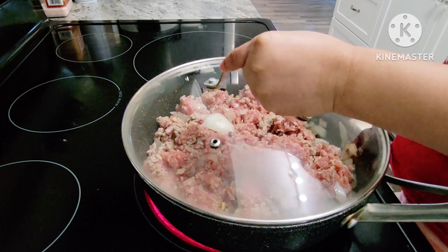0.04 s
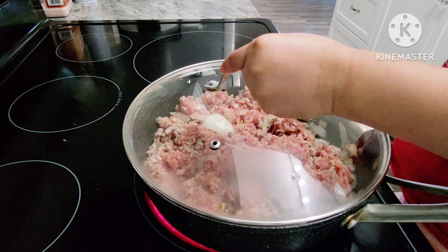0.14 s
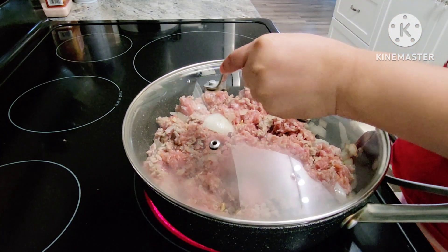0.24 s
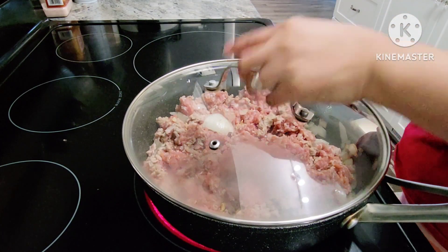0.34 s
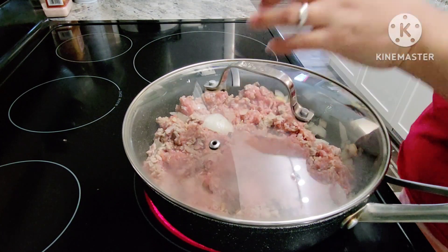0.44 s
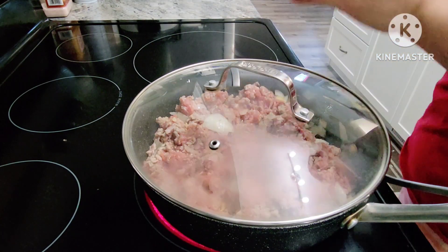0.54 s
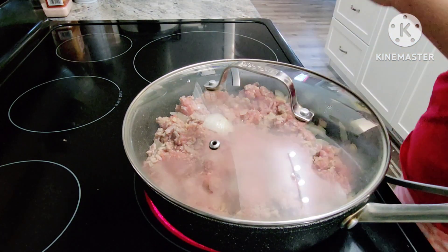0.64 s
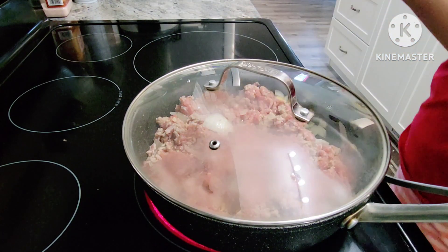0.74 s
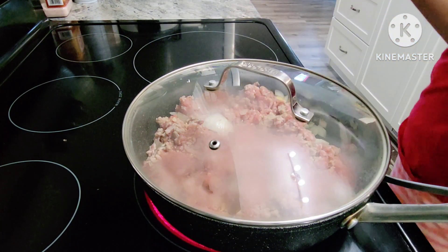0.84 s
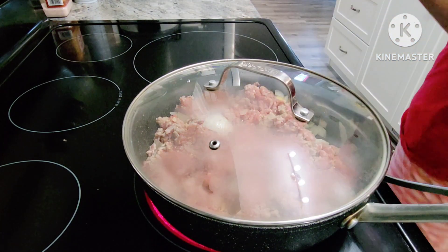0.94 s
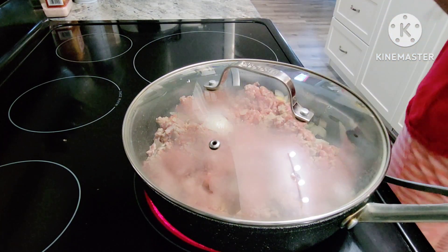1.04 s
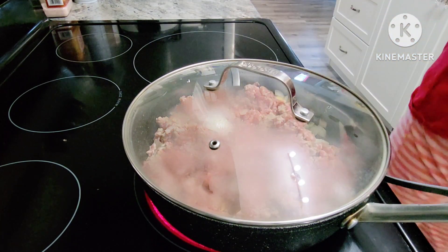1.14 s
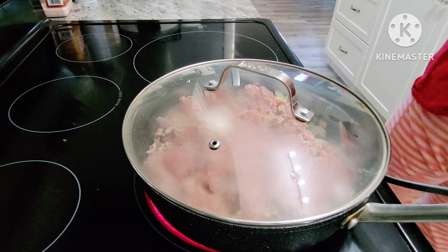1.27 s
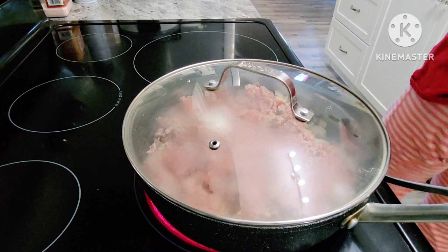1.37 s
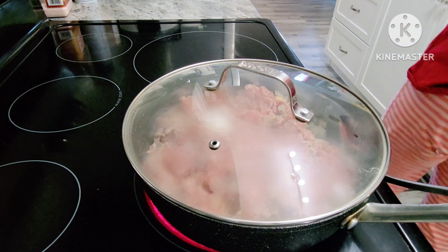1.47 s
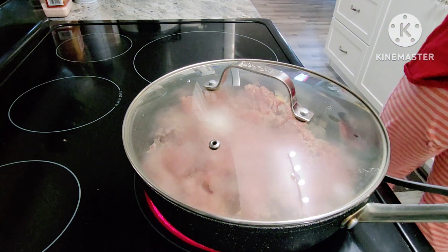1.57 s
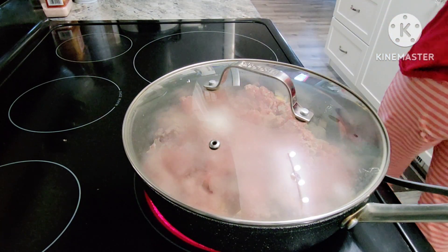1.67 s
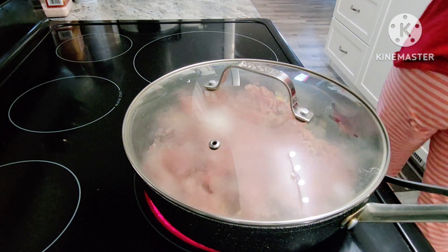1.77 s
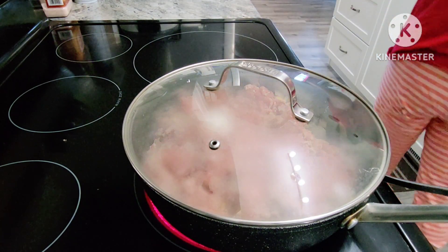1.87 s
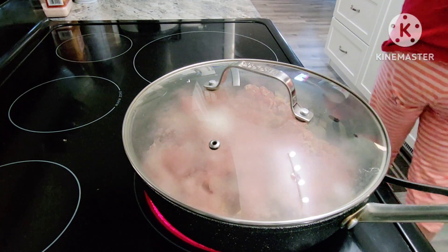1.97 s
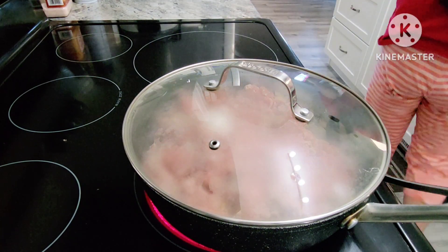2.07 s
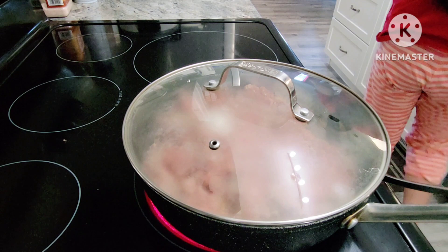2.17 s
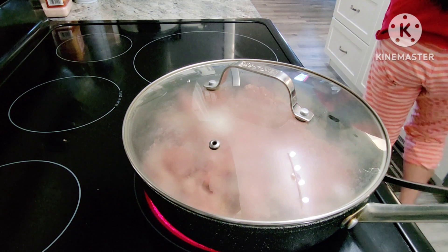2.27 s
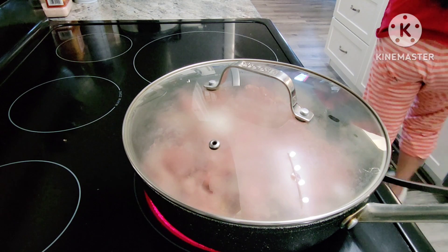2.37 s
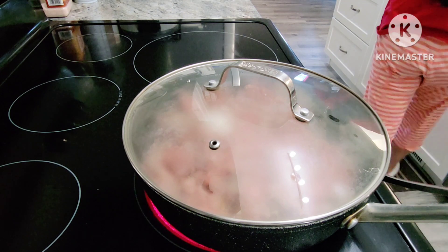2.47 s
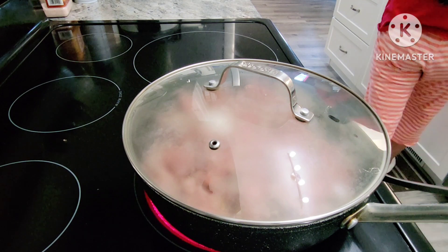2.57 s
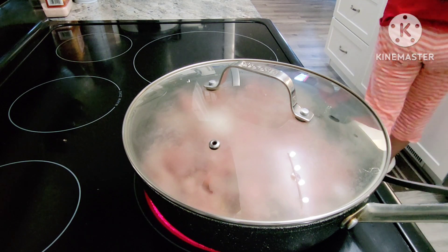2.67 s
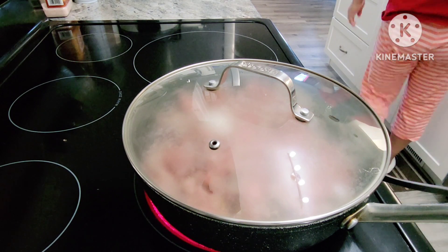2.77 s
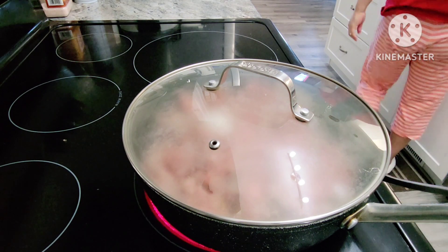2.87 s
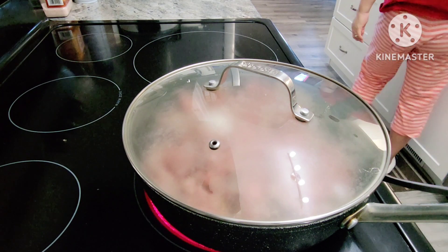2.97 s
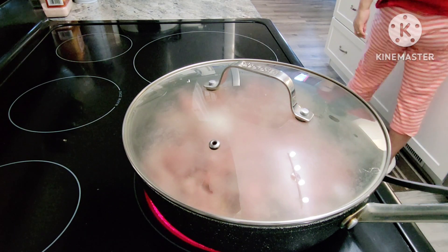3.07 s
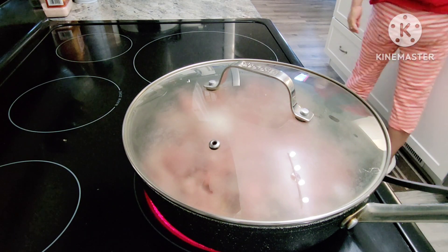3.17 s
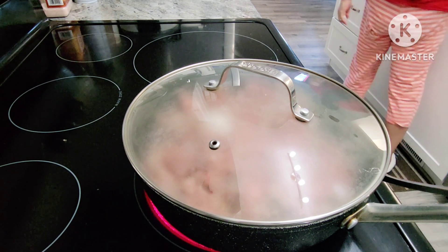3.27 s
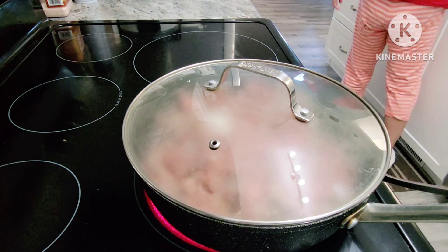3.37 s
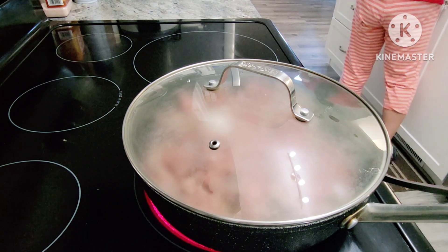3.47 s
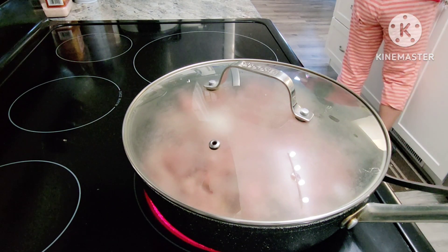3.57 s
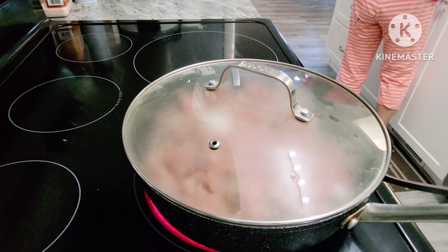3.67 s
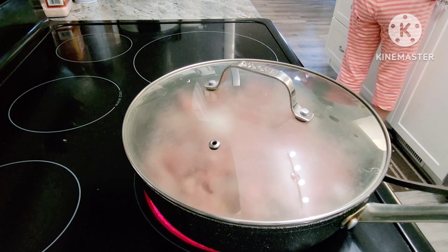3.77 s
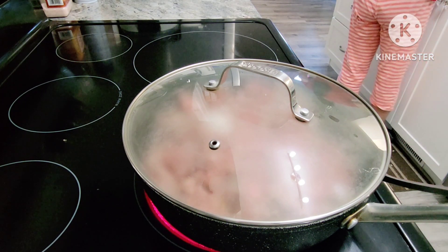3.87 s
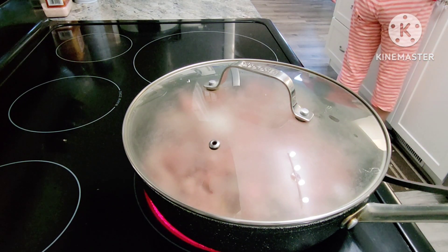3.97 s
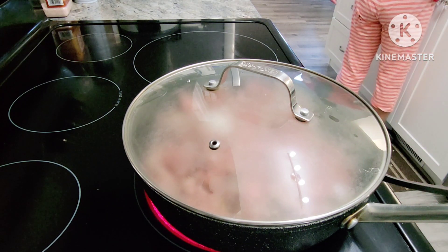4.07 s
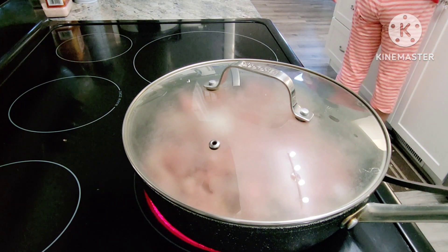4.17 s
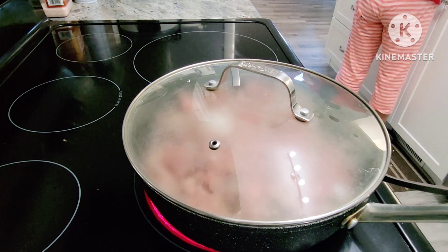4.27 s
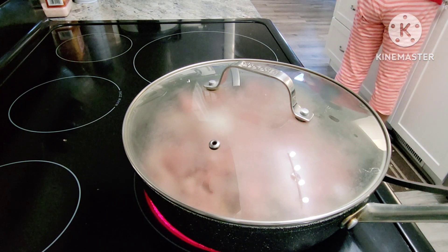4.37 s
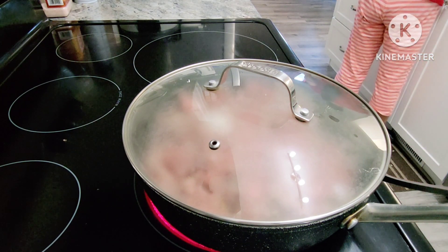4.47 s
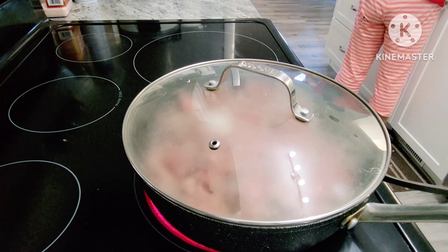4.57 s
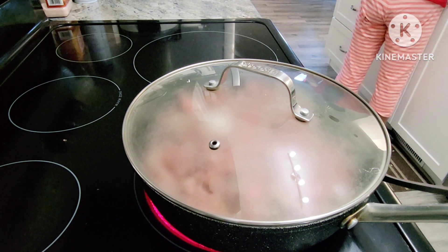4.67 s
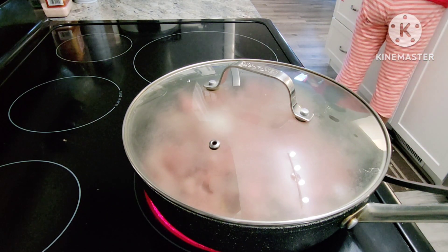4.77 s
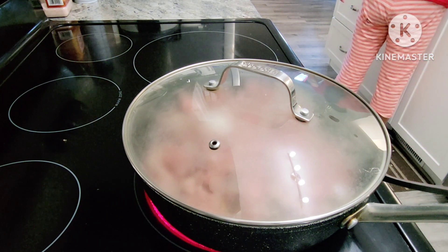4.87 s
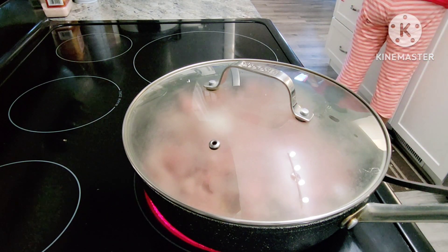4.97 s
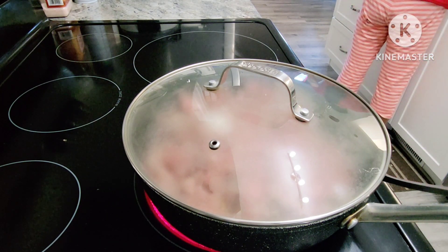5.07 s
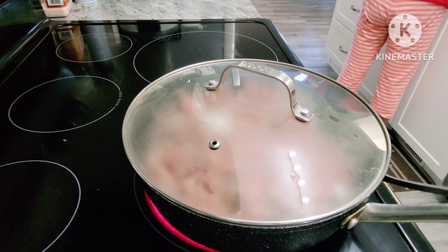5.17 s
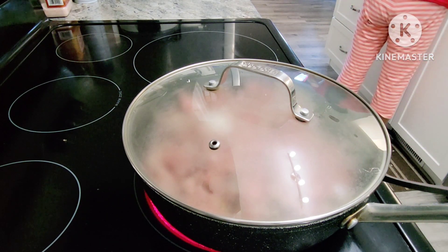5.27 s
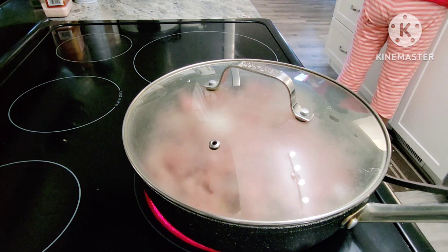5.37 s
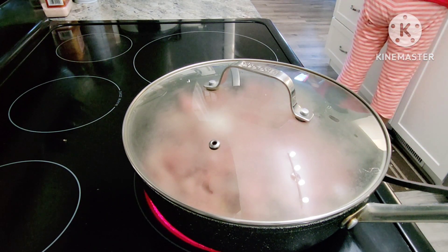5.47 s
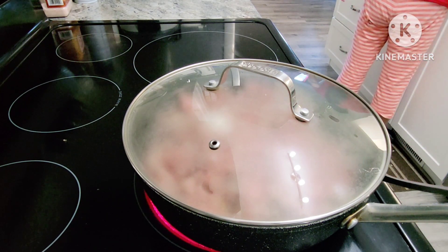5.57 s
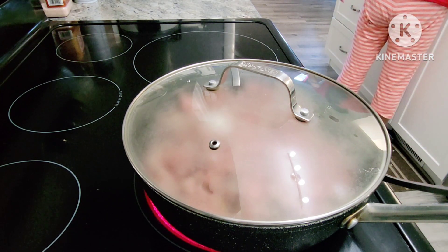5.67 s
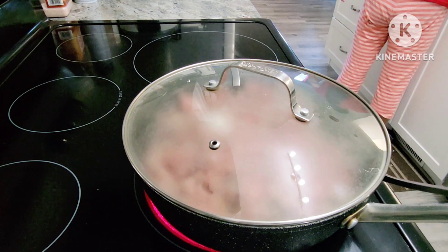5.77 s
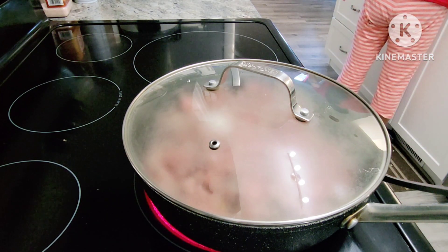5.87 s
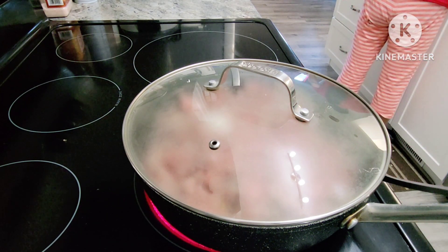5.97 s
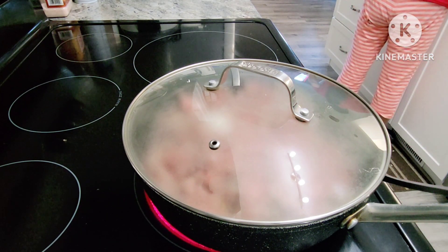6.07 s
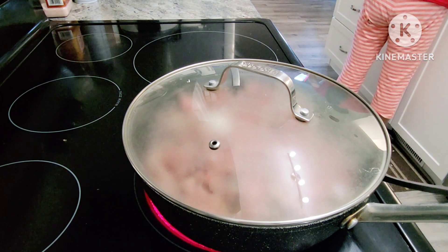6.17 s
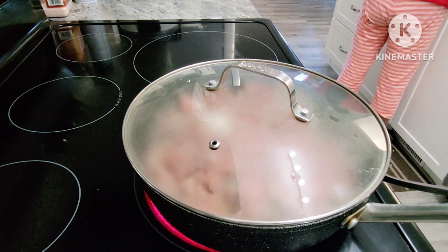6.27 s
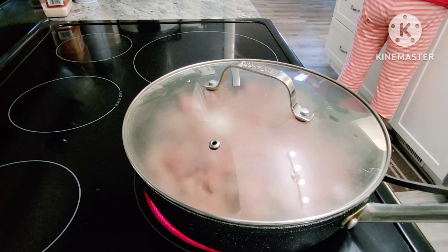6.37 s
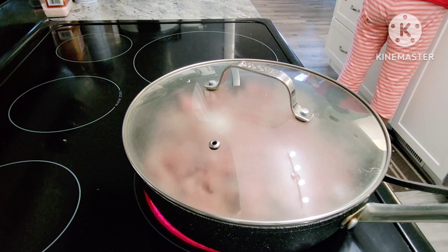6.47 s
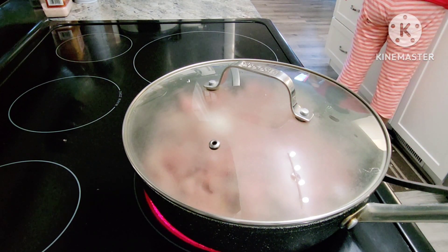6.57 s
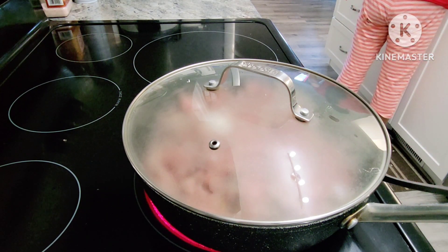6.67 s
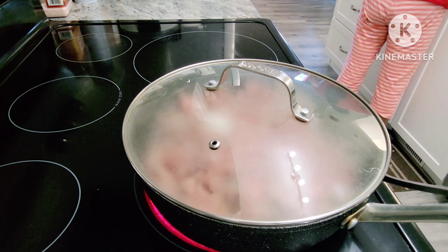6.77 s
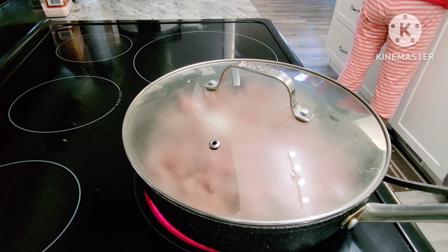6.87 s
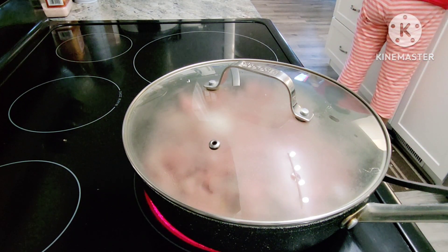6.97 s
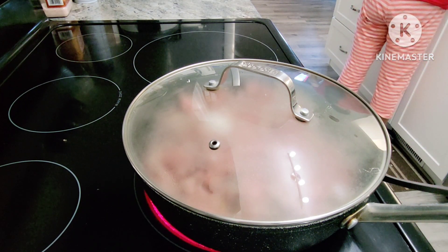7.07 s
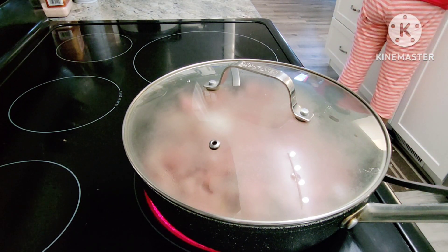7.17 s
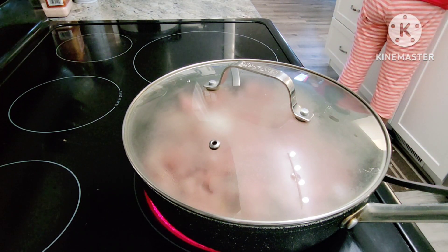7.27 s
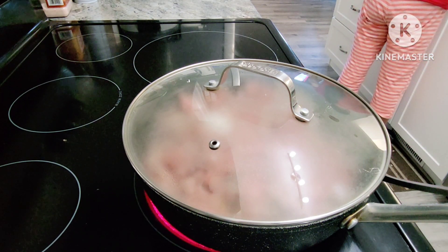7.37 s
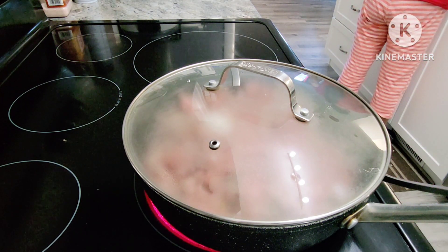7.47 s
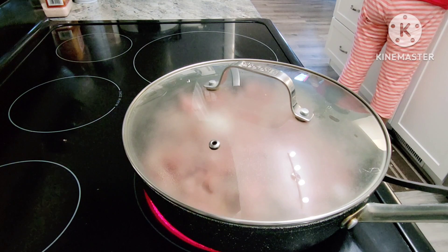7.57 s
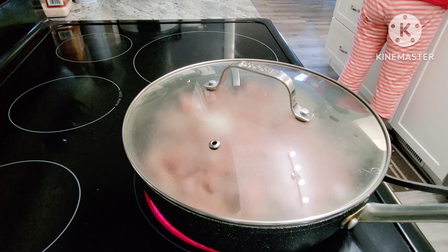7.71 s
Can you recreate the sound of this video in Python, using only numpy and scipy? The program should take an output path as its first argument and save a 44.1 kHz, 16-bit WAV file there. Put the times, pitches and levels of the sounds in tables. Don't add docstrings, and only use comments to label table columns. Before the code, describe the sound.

From 0 to 0.2 s, soft dull touches of a glass lid on a frying pan, close up, with a faint sleeve rub; at 0.2 s the rim lands in a loud, bright, very short clank of two or three rapid bounces, with little ringing. A low, wavering extractor hum and soft airy, muffled sizzle stay underneath throughout. Quiet until about 1.7 s, when faint slipper scuffs and woody cupboard knocks come from farther away, strongest near 1.88 s. At 2.05-2.15 s a dish clinks and settles, slightly right, with room echo. Faint thuds at 2.4-2.55 s and a dull low bump at 3.2 s. At 3.73 s a pot knocks hollowly and rebounds, shifting again at 3.9 s. From 4.45 s a tap dribbles, opens by 4.65 s, peaks near 5.1 s, sags, then hisses steadily with small splashes, fullest around 6.5-7 s, to the end at about 7.7 s.

```python
import sys
import numpy as np
from scipy import signal
from scipy.fft import rfft, irfft, next_fast_len
from scipy.io import wavfile
from scipy.ndimage import uniform_filter1d

SR = 44100
rng = np.random.default_rng(int(sys.argv[2]) if len(sys.argv) > 2 else 0)


def voltage_ratio(decibels):
    exponent = np.asarray(decibels, float) / 20
    return 10 ** exponent


def to_wav(sig):
    pcm = np.clip(np.atleast_2d(sig), -1, 1) * 32767
    pcm = np.round(pcm).astype(np.int16)
    wavfile.write(sys.argv[1], SR, pcm.T)


N = 341334

N_FFT = next_fast_len(N)
FREQ = np.arange(N_FFT // 2 + 1) * SR / N_FFT
TIME = np.arange(N) / SR
BLOW_T = np.arange(SR * 2 // 5) / SR
PORTS_HZ = 550
LEFT_RIGHT = np.array([[0.5], [-0.5]])


def lid():
    # start in seconds, peak in dB, sharpness of contact in Hz, chatter in ms, left minus right in dB.
    touches = [
        (0.001, -29, 700, 3, -1.5),
        (0.028, -30, 600, 3.9, -1.5),
        (0.095, -22, 300, 4, -0.5),
        (0.116, -16, 950, 3.7, 0.35),
        (0.175, -12.5, 600, 3.9, 0),
        (0.185, -16, 450, 3.1, 4),
    ]
    # start in seconds, peak in dB, sharpness in Hz, chatter in ms, left minus right in dB.
    clanks = [
        (0.2025, -1, 14000, 1.5, 0.81),
        (0.2075, -.7, 10000, 2.4, 0.8),
        (0.2125, -4, 6000, 1, 0),
    ]
    # pitch in Hz, level in dB, ring time to -60 dB in seconds.
    glass_modes = [(128, -6.5, 0.05), (280, -1, 0.07), (340, -7, 0.06), (480, -8.5, 0.08),
                   (573.5, -10, 0.12), (880.6, -2.5, 0.09), (1183, -13, 0.025), (1436, -12.5, 0.08),
                   (1790, -1, 0.017), (2200, 3, 0.021), (2730, -7, 0.02), (2990, -5, 0.02),
                   (3370, -6, 0.018), (4080, -9.5, 0.01)]
    # pitch in Hz, level in dB per Hz.
    touch_crowd = [(50, -34), (110, -6), (290, -3), (550, -3), (900, -8), (1600, -22), (2300, -7),
                   (3500, -11), (5500, -27), (15000, -32)]
    # pitch in Hz, level in dB per Hz.
    clank_crowd = [(70, -44), (140, -2), (290, -3), (600, -5), (1000, 0), (2000, -3), (3400, -7),
                   (5000, -24), (8000, -25), (15000, -33)]
    out, glass = np.zeros((2, N)), ring(glass_modes)
    for blow in touches:
        strike(out, blow, glass, touch_crowd, crowd_db=-5, crowd_t60=0.079, chatter_db=-22.0)
    for blow in clanks:
        strike(out, blow, glass, clank_crowd, crowd_db=3.5, crowd_t60=0.02, chatter_db=-26)
    return out


def sink():
    # start in seconds, peak in dB, sharpness of contact in Hz, chatter in ms, left minus right in dB.
    dish_blows = [
        (2.055, -24, 900, 10, -4),
        (2.074, -18.5, 6000, 15, -5.5),
        (2.097, -20.5, 1600, 9.4, -2),
        (2.149, -30, 1000, 8.8, -2.5),
    ]
    # start in seconds, peak in dB, sharpness of contact in Hz, chatter in ms, left minus right in dB.
    pot_blows = [
        (3.73, -18.5, 14000, 13, -1),
        (3.743, -21, 2200, 9.7, 1),
        (3.767, -18.5, 600, 11, 2),
        (3.892, -26, 1300, 11, -3),
        (3.93, -29, 600, 14, -2.5),
    ]
    # start in seconds, peak in dB, sharpness in Hz, left minus right in dB,
    # panel pitch in Hz.
    thuds = [(1.683, -37.5, 400, 2, 108), (1.75, -33, 3000, -6, 282), (1.845, -36, 500, -6, 192),
             (1.868, -28, 500, -5, 234), (1.879, -23.5, 1800, -8.5, 280), (1.915, -26, 700, -5, 273.6),
             (2.386, -34.5, 800, -5, 340), (2.4, -37, 400, -1, 129), (2.551, -37.5, 400, 1.9, 104),
             (3.173, -27, 447, 2, 125.5), (3.219, -30.5, 400, 1.5, 166.5), (4.099, -37.5, 400, 1.26, 113)]
    # pitch in Hz, level in dB, ring time to -60 dB in seconds.
    dish_modes = [(227, -7.5, 0.14), (290, -5.5, 0.13), (416.4, -7.5, 0.17), (589, -14, 0.183),
                  (1689, -24, 0.3), (1841, -18.5, 0.6), (2137, -23, 0.3), (2245, -17.5, 0.65),
                  (3004, -11.5, 0.8), (3130, -12, 0.38), (3670, -23, 0.4), (3926, -20, 0.55),
                  (4463, -28, 0.2), (4750, -29, 0.15)]
    # pitch in Hz, level in dB, ring time to -60 dB in seconds.
    pot_modes = [(96.3, 0.5, 0.26), (184, -2, 0.23), (523.4, -10, 0.18), (593, -12, 0.3), (1046, -11, 0.32),
                 (1281, -17, 0.1), (1480, -6, 0.14), (1850, -17, 0.22), (3030, -14, 0.33),
                 (3620, -15.5, 0.25), (4380, -13, 0.2), (4580, -19, 0.25), (7170, -24, 0.12)]
    # ratio to the panel pitch, level in dB, ring time in seconds.
    panel_modes = [(1.0, 1, 0.12), (1.35, -7.5, 0.1), (2.1, -13, 0.07), (3.2, -7, 0.046)]
    # pitch in Hz, level in dB per Hz.
    dish_crowd = [(60, -39), (110, -12), (300, -3.5), (565, -6.5), (900, -17.5), (1890, -15.5), (3080, -19),
                  (4800, -25.5), (8000, -33), (12000, -70)]
    # pitch in Hz, level in dB per Hz.
    pot_crowd = [(40, -18), (90, 0), (200, -9.5), (526, -15), (800, -26), (1490, -19.5), (2300, -27),
                 (3660, -23), (5500, -31), (7300, -24.5), (10000, -39), (15000, -33)]
    # pitch in Hz, level in dB per Hz.
    panel_crowd = [(60, -29), (150, -3), (400, 0), (900, -9), (2000, -15), (5000, -31), (15000, -36)]
    out, dish, pot = np.zeros((2, N)), ring(dish_modes), ring(pot_modes)
    for blow in dish_blows:
        strike(out, blow, dish, dish_crowd, crowd_db=-3.0, crowd_t60=0.15, chatter_db=-30)
    for blow in pot_blows:
        strike(out, blow, pot, pot_crowd, crowd_db=-1.5, crowd_t60=0.17, chatter_db=-29.5)
    for start, peak_db, sharp_hz, pan_db, pitch_hz in thuds:
        panel = ring([(ratio * pitch_hz, db, t60) for ratio, db, t60 in panel_modes])
        blow = (start, peak_db, sharp_hz, 7.5, pan_db)
        strike(out, blow, panel, panel_crowd, crowd_db=-9, crowd_t60=0.088, chatter_db=-28)
    return out


def strike(out, blow, clear, crowd_colour, crowd_db, crowd_t60, chatter_db):
    start, peak_db, sharp_hz, chatter_ms, pan_db = blow[:5]
    count = len(BLOW_T)
    hz = np.arange(count // 2 + 1) * SR / count

    chatter_fade = np.exp(-BLOW_T * 1000 / max(chatter_ms, 0.5))
    force = voltage_ratio(chatter_db) * rng.standard_normal(count) * chatter_fade
    force[0] += 1
    soft = np.exp(-2 * np.pi * sharp_hz / SR)
    force = signal.lfilter([1], np.poly([soft, soft]), force)

    mid, side = rfft(rng.standard_normal((2, count)))
    apart = 0.82 * np.array([[1], [-1]]) * np.minimum(hz / PORTS_HZ, 1) ** 2
    crowd = irfft((mid + apart * side) * voltage_ratio(curve(crowd_colour, hz)))
    crowd = level(crowd, crowd_db) * np.exp(-BLOW_T * np.log(1000) / crowd_t60)

    sound = signal.fftconvolve(force[None], clear + crowd, axes=1)[:, :count]
    peak = np.abs(sound.mean(axis=0)).max()
    i = int(start * SR)
    out[:, i:i + count] += voltage_ratio(peak_db + pan_db * LEFT_RIGHT) * sound / peak


def ring(modes):
    hz, db, t60 = np.transpose(modes)[:, :, None]
    turn = rng.uniform(-1.01, 0.94, hz.shape) * np.minimum(hz / PORTS_HZ, 1) ** 2
    fade = voltage_ratio(db) * np.exp(-BLOW_T * np.log(1000) / t60)
    phase = 2 * np.pi * hz * BLOW_T
    return np.array([np.sum(fade * np.sin(phase + side * turn), axis=0) for side in (1, -1)])


def tap():
    # time in seconds, jet level in dB.
    flow = [
        (4.44, -70),
        (4.51, -64.5),
        (4.57, -56),
        (4.625, -56),
        (4.655, -45),
        (5.1, -41.5),
        (5.33, -46.5),
        (5.7, -43),
        (7.74, -43.5),
    ]
    # time in seconds, extra splash in dB, half length in seconds.
    slops = [
        (4.983, 2, .1),
        (5.847, 3, 0.12),
        (6.16, 2.5, 0.11),
        (6.49, 4, .07),
        (6.674, 5.5, .1),
        (6.953, 3, 0.37),
    ]
    # pitch in Hz, level in dB per Hz.
    jet_colour = [(2650, -31), (4500, -6.5), (4900, -13), (6300, -10.5), (7140, -0.5), (7490, -0.5),
                  (8200, -6.5), (9310, -11), (10100, -9), (10900, -11.5), (11800, -5), (12900, -0.5),
                  (14000, -9.5), (15000, -7.5), (16000, -18)]
    # pitch in Hz, level in dB per Hz.
    splash_colour = [(500, -15.5), (1000, -9), (1500, -1.5), (2000, -5), (2900, 0.5), (3700, -1.5),
                     (4500, -2), (5600, -8.5), (7000, -27)]
    # pitch in Hz, left minus right in dB.
    tap_side = [(60, -4), (110, -3.5), (200, -2), (380, -9), (700, -4), (1290, -3), (2380, 0.0),
                (4400, -0.5), (8120, -1), (15000, -11)]
    flow_db = np.interp(TIME, *np.transpose(flow), left=-99)
    slop_db = sum(db * np.maximum(1 - abs(TIME - s) / half, 0) for s, db, half in slops)
    splash_db = np.minimum(flow_db + 2, -52.5) + slop_db
    jet_db = flow_db + 0.12 * slop_db
    jet = voltage_ratio(jet_db) * stream(jet_colour, 0.79, 12, grains(0.54), ripple_db=1.2)
    splash = voltage_ratio(splash_db) * stream(splash_colour, 1.3, 9, grains(1.5), ripple_db=3)
    side_db = curve(tap_side, FREQ) * LEFT_RIGHT
    return voltage_ratio(3) * irfft(rfft(jet + splash, N_FFT) * voltage_ratio(side_db))[:, :N]


def rustle():
    # time of the peak in seconds, peak in dB, time to die away in seconds, brightness in dB.
    strokes = [
        (0.001, -48.5, .3, -9),
        (.114, -45, .05, -4),
        (.184, -38, .03, -0.5),
        (1.758, -56, .06, -2),
        (1.84, -62.5, .09, 7),
        (1.9, -58, 0.083, 3),
        (2.05, -66, .08, 8),
        (2.57, -60, .16, 4),
        (3.204, -53.5, .1, 1),
        (3.9, -62, .15, 3),
    ]
    # pitch in Hz, level in dB per Hz.
    rustle_colour = [(300, -7), (900, 3.5), (2300, 1), (4000, -5), (7000, -9), (9500, -15.5), (13000, -12),
                     (16000, -14)]
    colour = pair(500.0, grains(2.3)) * voltage_ratio(curve(rustle_colour, FREQ))
    whole = level(colour, 2.5 + 10 * np.log10(N_FFT))
    dull = irfft(whole / (1 + (FREQ / 4500) ** 4))[:, :N]
    bright = irfft(whole)[:, :N] - dull
    gains = []
    for peak_s, peak_db, fall_s, _ in strokes:
        away = np.where(TIME < peak_s, (peak_s - TIME) / 0.77, TIME - peak_s) / fall_s
        gains.append(voltage_ratio(np.maximum(peak_db - 16.5 * away, -150)))
    gains = np.array(gains)
    brightness = voltage_ratio(np.array(strokes)[:, 3])
    return dull * gains.sum(axis=0) + bright * (brightness @ gains)


def fan():
    # pitch in Hz, level in dB per Hz.
    air_colour = [(300, -33), (430, -1), (600, -6.5), (840, -5), (1300, -9), (2200, -14), (3300, -12.5),
                  (4000, -19), (6000, -18.5), (10000, -23.5), (13000, -22), (16000, -28.5)]
    # pitch in Hz, width in Hz, level in dB.
    duct_modes = [(58.6, 24, -56.5), (94.7, 19, -56.5), (119, 11, -49), (171, 56, -62.5),
                  (300, 42.7, -54.5), (827, 72, -65.5)]
    air = voltage_ratio(-55.5 + 2.5) * stream(air_colour, 0.89, 6, grains(1.05), ripple_db=1.15)
    power = 0
    for hz, width, db in duct_modes:
        power = power + voltage_ratio(2 * db) / width / (1 + ((FREQ - hz) / width * 2) ** 4)
    hum = irfft(pair(320.0, hiss) * np.sqrt(power))[:, :N]
    return air + level(hum, -47)


def room(x):
    # band centre in Hz, ring time to -60 dB in seconds, level in dB.
    tail_bands = [(150, 0.33, -5), (600, 0.46, 2), (2400, 0.5, -6), (9000, 0.13, -10)]
    t = np.arange(SR // 2) / SR
    noise = irfft(pair(320.0, hiss))[:, :len(t)]
    tail = 0
    for hz, t60, db in tail_bands:
        octaves = signal.butter(1, [hz / 2, hz * 2], "band", fs=SR, output="sos")
        tail = tail + voltage_ratio(db) * signal.sosfilt(octaves, noise) * np.exp(-t * np.log(1000) / t60)
    tail = tail * np.minimum(t / 0.01, 1)
    return signal.oaconvolve(x, tail / np.sqrt(np.sum(tail ** 2) / 2), axes=1)[:, :N]


def stream(points, flicker_db, rate, source, ripple_db, alike_hz=400.0):
    ripple = np.interp(FREQ, np.arange(200) * 110.0, rng.standard_normal(200))
    spectrum = pair(alike_hz, source) * voltage_ratio(curve(points, FREQ) + ripple_db * ripple)
    place = np.interp(np.log(FREQ + 1), np.log([points[1][0], points[-2][0]]), [0, 2])
    total = 0
    for k in range(3):
        part = irfft(spectrum * np.maximum(1 - abs(place - k), 0))[:, :N]
        total = total + voltage_ratio(flicker_db * walk(rate)) * part
    return level(total, 0)


def pair(alike_hz, source):
    mid, side = rfft(source(), N_FFT), rfft(source(), N_FFT)
    alike = 1 / (1 + (FREQ / alike_hz) ** 4)
    return np.sqrt(1 + alike) * mid + np.sqrt(1 - alike) * side * np.array([[1], [-1]])


def hiss():
    return rng.standard_normal(N)


def grains(spread_db):
    def source():
        sizes = voltage_ratio(spread_db * rng.exponential(size=N // 32 + 1))
        return hiss() * np.repeat(sizes, 32)[:N]
    return source


def walk(rate):
    k = int(SR / rate)
    steps = np.repeat(rng.standard_normal(N // k + 1), k)
    return 1.15 * uniform_filter1d(uniform_filter1d(steps, k), k)[:N]


def curve(points, hz):
    points = np.array(points)
    return np.interp(np.log(hz + 1), np.log(points[:, 0] + 1), points[:, 1])


def level(x, db):
    return x * voltage_ratio(db) / np.sqrt(np.mean(abs(x) ** 2))


def scene():
    near, far = lid(), sink()
    echoes = room(voltage_ratio(-16.5) * near + voltage_ratio(-5) * far)
    return near + voltage_ratio(-1.5) * far + echoes + fan() + tap() + rustle()


def low_pass(x):
    return signal.sosfilt(signal.butter(12, 15600, fs=SR, output="sos"), x)


def record(dry):
    bass_cut = signal.butter(2, 31, "high", fs=SR, output="sos")
    top_cut = signal.ellip(10, 0.3, 40, 15520, fs=SR, output="sos")
    heard = signal.sosfilt(bass_cut, dry)
    rounded = np.tanh(0.7 * heard) / 0.7
    return low_pass(signal.sosfilt(top_cut, rounded))


dry = scene()
out = record(dry)
to_wav(out)
```